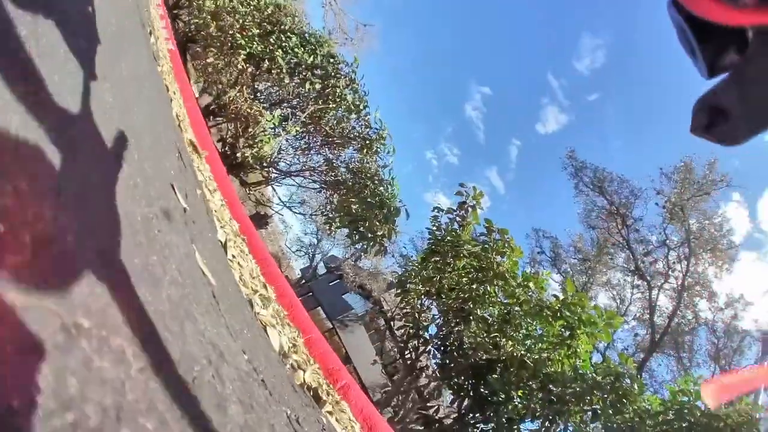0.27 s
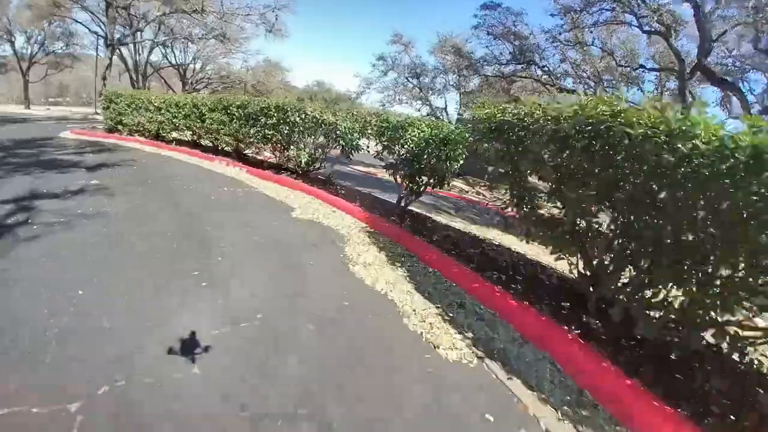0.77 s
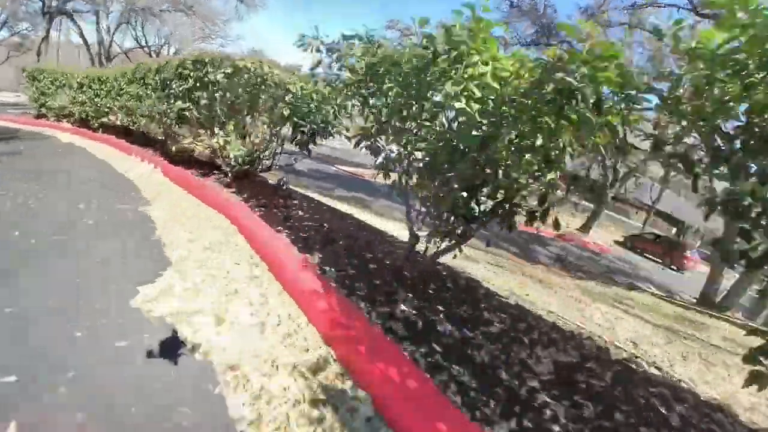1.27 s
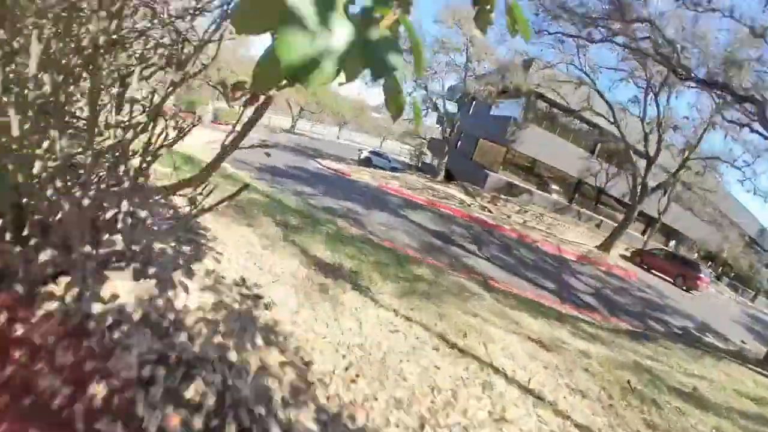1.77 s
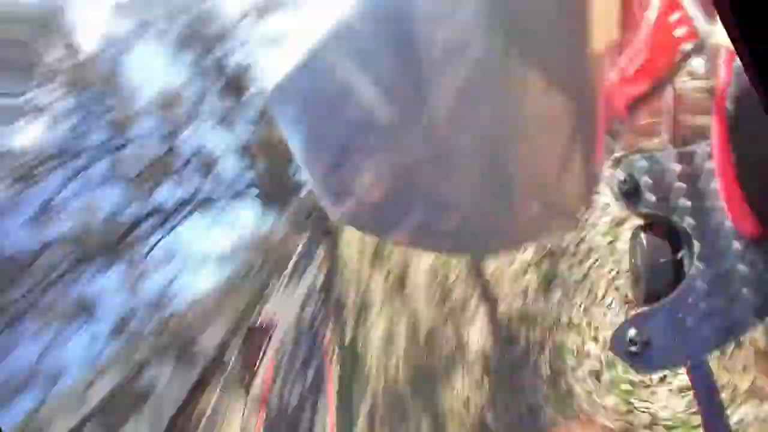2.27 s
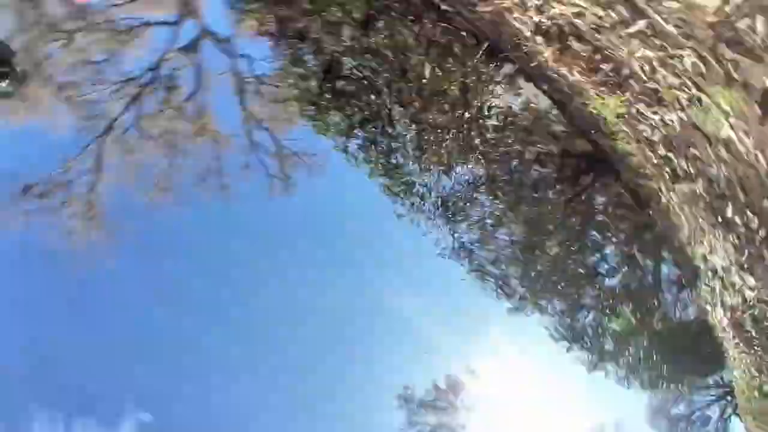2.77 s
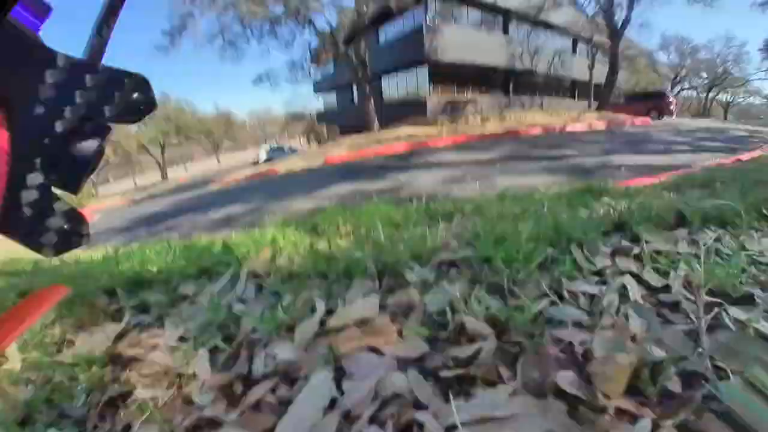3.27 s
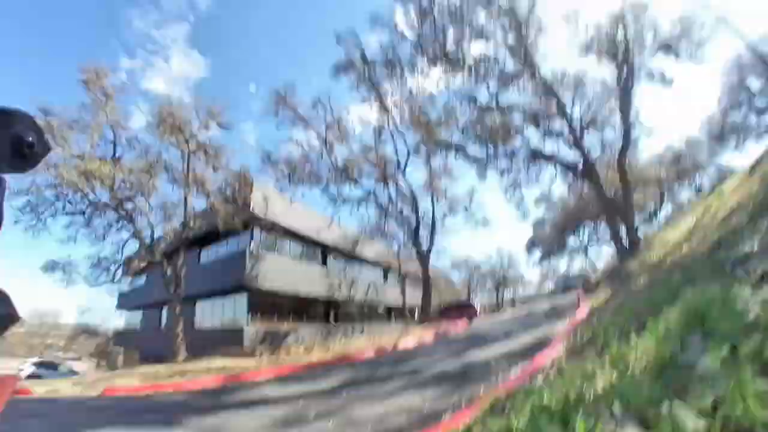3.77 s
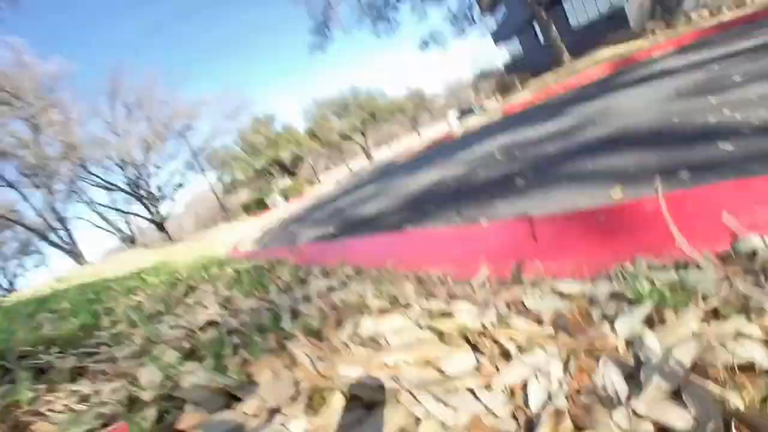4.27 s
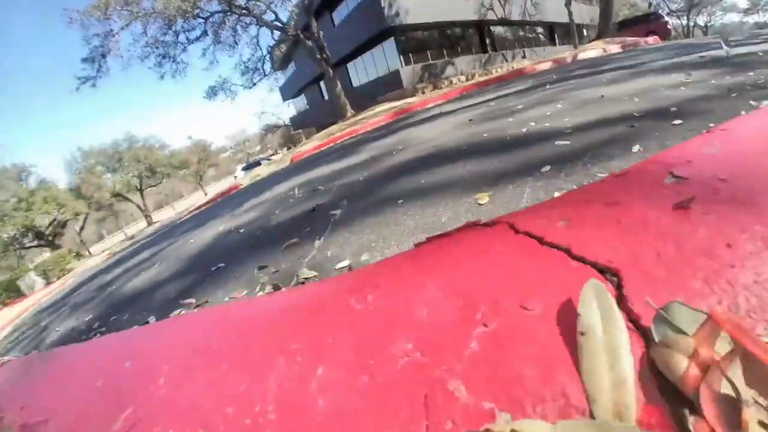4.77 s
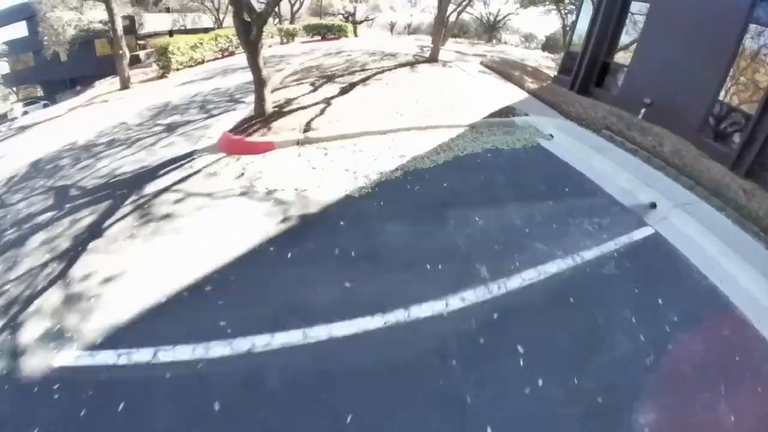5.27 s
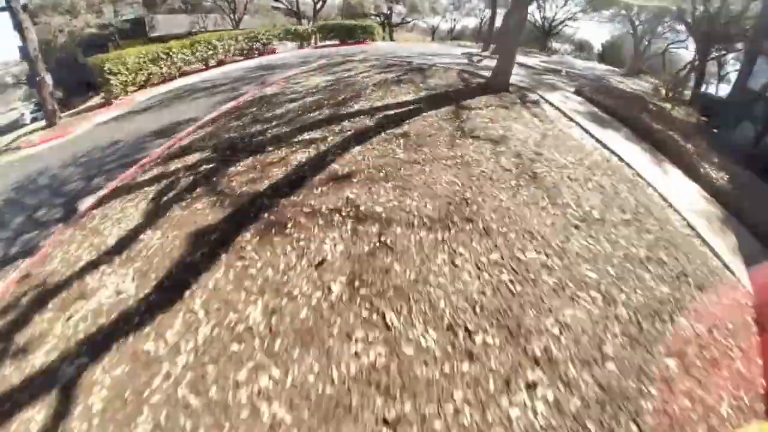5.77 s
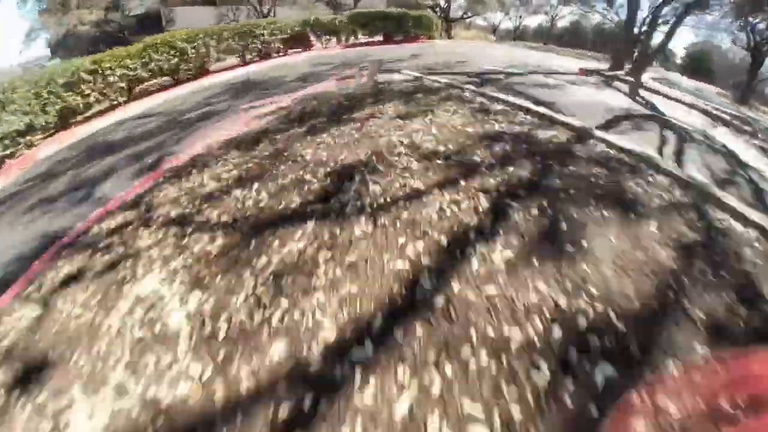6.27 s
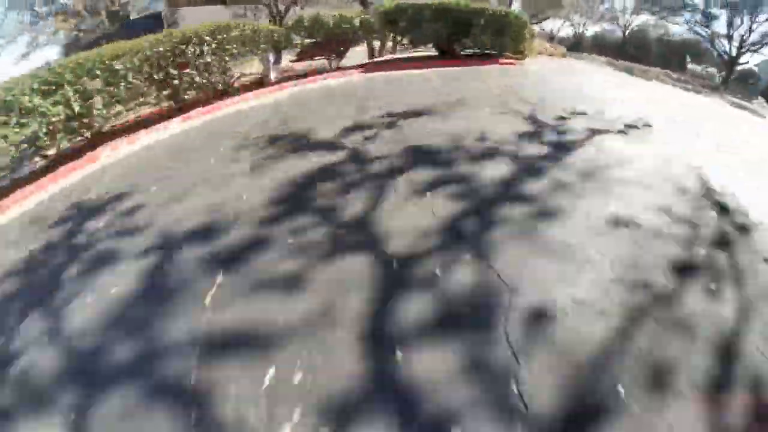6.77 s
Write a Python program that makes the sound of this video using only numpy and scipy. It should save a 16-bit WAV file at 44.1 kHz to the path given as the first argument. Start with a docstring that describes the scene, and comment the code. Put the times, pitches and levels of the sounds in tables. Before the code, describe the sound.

Heard on board, a quadcopter buzzes, crashes with shrieking motors, cracking twigs and crunching leaves, and after a pause whines steadily in flight.

```python
"""A small racing quadcopter with four three-bladed rotors, heard on board in three abruptly joined scenes.
0 s: it settles after a fall, with a few knocks and a propeller running down.
0.8 s: it flies at a hedge, the rotors beating against each other and chopping the air.
At 1.8 s it hits; two motors scream in the branches and it tumbles through dry leaves until 4.8 s.
5.3 s: it flies fast and low until the throttle is cut at 6.8 s and it sinks into its own wake."""
import sys
import numpy as np
from scipy.fft import rfft, irfft, next_fast_len
from scipy.io import wavfile
from scipy.ndimage import map_coordinates

SR = 44100
rng = np.random.default_rng(int(sys.argv[2]) if len(sys.argv) > 2 else 0)


def to_wav(sig):
    """Store sig (one row per channel, or 1-D mono) as 16-bit WAV at the path in sys.argv[1].

    Samples outside -1..1 are clipped; the rate is SR.
    """
    pcm = np.clip(np.atleast_2d(sig), -1, 1) * 32767
    pcm = np.round(pcm).astype(np.int16)
    wavfile.write(sys.argv[1], SR, pcm.T)  # frames by channels


N = 310464


def amp(db):
    return 10 ** (np.asarray(db) / 20)


def unit_rms(x):
    return x / np.sqrt(np.mean(x ** 2) + 1e-20)


def clock():
    return np.arange(N) / SR


def curves(rows):
    """One value per sample for each column after the time."""
    times, *columns = np.transpose(rows)
    return [np.interp(clock(), times, column) for column in columns]


def span(start_s, end_s, fade_s):
    """Gate: on at once, fading out up to the end."""
    return (clock() >= start_s) * np.clip((end_s - clock()) / fade_s, 0, 1)


def swell(start_s, end_s, rise_s, fall_s):
    """Gain 1 from start to end; rise and fall times are per 20 dB."""
    t = clock()
    return amp(-20 * np.clip(np.maximum((start_s - t) / rise_s, (t - end_s) / fall_s), 0, 10))


def boost_db(rows, edge_s):
    """Extra level over each (start, end, dB) stretch, with sloping edges."""
    return sum(np.interp(clock(), [start - edge_s, start, end, end + edge_s], [0, db, db, 0])
               for start, end, db in rows)


def wobble(rate_hz):
    """Smooth random curve through Gaussian knots."""
    knots = rng.standard_normal(int(N * rate_hz / SR) + 4)
    fine = np.arange(0, len(knots), 1 / 8)
    return np.interp(clock() * rate_hz, fine, map_coordinates(knots, [fine]))


def colour(x, spectrum):
    """Minimum-phase filter of unit power gain through (Hz, dB) points."""
    size = 2 * next_fast_len(N // 2 + SR // 4)
    hz, db = np.transpose(spectrum)
    bin_hz = np.fft.rfftfreq(size, 1 / SR)
    gain = unit_rms(amp(np.interp(np.log(bin_hz + 1), np.log(hz), db)))
    cepstrum = irfft(np.log(gain + 1e-6), size)
    cepstrum[1:size // 2] *= 2
    cepstrum[size // 2 + 1:] = 0
    return irfft(rfft(x, size) * np.exp(rfft(cepstrum)), size)[:N]


def noise(spectrum, texture=1):
    """Coloured noise of rms 1; the texture shapes it in time before the filter."""
    return unit_rms(colour(texture * rng.standard_normal(N), spectrum))


def crackle(spectrum, snap_db, clump_db):
    """Dry leaves: tiny snaps of very unequal size, bunched in clumps."""
    return noise(spectrum, amp(snap_db * wobble(3000) + clump_db * wobble(260)))


def spin(hz, jitter, rate_hz):
    """Angle [rad] of a rotation with unsteady speed."""
    return 2 * np.pi * (np.cumsum(hz * (1 + jitter * wobble(rate_hz))) / SR + rng.random())


def partials(angle, orders, flutter_db):
    """Partials locked to a shaft, each fluttering in the turbulent air."""
    return sum(amp(db + flutter_db * wobble(45)) * np.sin(order * angle + 2 * np.pi * rng.random())
               for order, db in orders)


# Outdoor hum (frequency [Hz], level [dB])
HUM_SPECTRUM = [(18, -70.5), (30, -32), (164, -12), (324, -6.5), (410, -8.5), (467, -3.5), (691, 0),
                (897, -3), (1470, -12.5), (3070, -20), (14000, -27), (15500, -31)]


def outdoor_hum():
    """Distant hum, louder from the second scene on."""
    return amp(np.where(clock() < 0.77, -75, -70)) * noise(HUM_SPECTRUM)


# Flutter peaks (time [s], level [dB])
FLUTTER_PEAKS = [(.01, -39), (2.93, -59), (3.48, -60.5)]
# Flutter (frequency [Hz], level [dB])
FLUTTER_SPECTRUM = [(150, -34), (350, -4.5), (500, -0.5), (900, -2.5), (1500, -15.5), (4000, -40)]


def stalled_propeller(edge_s=0.079):
    """A stalled propeller flutters softly."""
    gain = sum(amp(db) * swell(s, s, edge_s, edge_s) for s, db in FLUTTER_PEAKS)
    return gain * noise(FLUTTER_SPECTRUM)


# Coasting propeller (time [s], blade-pass frequency [Hz], level [dB])
RUNDOWN = [(.07, 1600, -75), (.1, 1530, -57), (.13, 1300, -67), (.16, 980, -65), (.2, 600, -80),
           (.225, 450, -70), (.255, 415, -56), (.29, 405, -65), (.37, 400, -78)]


def rundown():
    """A faint, shaky whine falls as a propeller coasts to rest."""
    hz, db = curves(RUNDOWN)
    angle = spin(hz, jitter=0.035, rate_hz=260)
    gate = span(RUNDOWN[0][0], RUNDOWN[-1][0], fade_s=0.02)
    return amp(db + 3.1 * wobble(120)) * np.sin(angle) * gate


# Hard contacts (time [s], tick level [dB], thud re tick [dB], strikes [count])
CONTACTS = [(0.0191, -28.5, -24, 1), (.078, -24, -45, 1), (.3535, -46.5, -33, 1), (1.8023, -12, -13, 1),
            (2.0245, -14.5, -40, 1), (2.7036, -16, -27, 1), (2.7687, -28, -23, 2), (3.143, -42.5, -0.5, 1),
            (3.1748, -15, -17.5, 1), (3.2045, -23, -13, 1), (3.2188, -16.5, -22, 1), (3.2349, -27, -15, 3),
            (3.31, -37, -21, 1), (3.421, -34.5, -31.5, 1), (3.435, -31.5, -16, 1), (3.69, -36, -26.5, 1),
            (3.9525, -16, -39, 1), (4.187, -14, -17, 1), (4.2187, -18, -26, 1), (4.2945, -25, -15, 1),
            (4.3416, -20, -14, 3), (4.4005, -26, -12, 1), (4.4762, -19.5, -18, 1), (4.6688, -35, -10, 1),
            (4.707, -29.5, -12.5, 3)]
# Sharp tick and dull thud (frequency [Hz], level [dB])
TICK_SPECTRUM = [(300, -20), (1200, -1), (2700, -1.5), (4500, -2.5), (9000, -9.5), (15000, -16.5)]
THUD_SPECTRUM = [(30, -20.5), (120, -8), (300, 0.5), (700, 1), (1200, -3.5), (2500, -16.5), (6000, -42.5)]


def knocks(tick_gain_db=9.5, thud_gain_db=27, tick_t60_s=0.0089, thud_t60_s=0.013):
    """The stiff frame hardly rings: each contact is a sharp push and a brief rattle of equal energy."""
    blade_gap_s, blade_loss_db = 0.0147, 2
    t = np.arange(SR // 20) / SR
    ticks, thuds = np.zeros(N), np.zeros(N)

    def strike(track, start_s, db, t60_s):
        rattle = rng.standard_normal(len(t)) * amp(-60 * t / t60_s)
        blow = (t == 0) + rattle / np.linalg.norm(rattle)
        track[round(start_s * SR):][:len(t)] += amp(db) * blow / np.linalg.norm(blow)

    for first_s, first_db, thud_db, strikes in CONTACTS:
        for blade in range(round(strikes)):  # a turning propeller strikes repeatedly
            start_s = first_s + blade * blade_gap_s
            db = first_db - blade * blade_loss_db
            strike(ticks, start_s, db + tick_gain_db, tick_t60_s)
            strike(thuds, start_s, db + thud_db + thud_gain_db, thud_t60_s)
    return colour(ticks, TICK_SPECTRUM) + colour(thuds, THUD_SPECTRUM)


# Slides (start [s], end [s], level [dB])
SLIDES = [(1.95, 2.17, -42), (2.58, 2.739, -55), (2.78, 2.872, -60.5), (3.218, 3.47, -57),
          (3.619, 3.68, -60), (3.98, 4.241, -54.5), (4.36, 4.788, -40.5)]
# Light brushing (frequency [Hz], level [dB])
BRUSH_SPECTRUM = [(59, -71), (100, -31.5), (243, -16.5), (326, -11), (487, -6), (879, -4.5), (1430, -12.5),
                  (2810, -3), (4020, -9.5), (8770, -7.5), (15500, -14)]


def leaf_slides(snaps_per_s=110, edge_s=0.068, gain_db=-5):
    """Leaves slide along the frame; single dry ones break."""
    snaps = (rng.random(N) < snaps_per_s / SR) * amp(4 * rng.standard_normal(N))
    scrape = crackle(BRUSH_SPECTRUM, snap_db=3.5, clump_db=3)
    breaks = amp(-6.5) * unit_rms(colour(snaps, TICK_SPECTRUM))
    gain = sum(amp(db + gain_db) * swell(start, end, edge_s, edge_s) for start, end, db in SLIDES)
    return gain * (scrape + breaks)


# Plunges into leaves (peak time [s], level [dB], fall per 20 dB [s])
PLUNGES = [(.005, -44.5, 0.1), (1.886, -23.5, .014), (1.961, -26.5, .04), (2.05, -29.5, .045),
           (2.302, -25, 0.03), (2.322, -25.5, .012), (2.37, -45, .035), (2.482, -37, 0.04),
           (2.549, -21.5, .013), (2.636, -24, 0.0217), (2.684, -30, .014), (3.139, -36, 0.01),
           (3.168, -32, .012), (3.191, -32, .014), (3.594, -22, 0.02), (3.866, -44, .02),
           (3.897, -29, 0.0341), (3.927, -27, .022), (4.184, -28.5, 0.0174), (4.285, -36, 0.07),
           (4.336, -29, 0.0383), (4.462, -32, 0.0637), (4.56, -40, 0.0636)]
# Breaking twigs (time [s], level [dB])
TWIG_CRACKS = [(.262, -60), (.41, -70), (1.801, -29), (1.866, -16.5), (2.107, -24), (2.25, -21.5),
               (2.668, -22), (2.75, -26), (2.857, -46), (2.971, -47), (3.022, -44), (3.123, -47),
               (3.39, -44), (3.563, -31.5), (3.876, -19.5), (4.265, -33.5), (4.327, -25.5)]
# Crushed leaves and the frame's ring (frequency [Hz], level [dB])
CRUNCH_SPECTRUM = [(35, -36), (60, -21), (464, -2), (613, -1.5), (1320, -3), (2050, 1.5), (2250, 4),
                   (4520, -2), (5580, 2), (6870, -5), (8470, -4), (14100, -12), (15500, -10.5)]
FRAME_SPECTRUM = [(300, -17.5), (1200, -10.5), (1800, -2.5), (2500, -1), (3200, -5), (4200, -12.5),
                  (9000, -23)]


def leaf_crunches(settle_db=-26, settle_s=0.11):
    """Plunges swell, fade and settle, and twigs crack; hard hits shake the frame, light ones rustle."""
    power = np.zeros(N)
    for peak_s, db, fall_s in PLUNGES:
        rise_s = 0.82 * fall_s
        power += (amp(db) * swell(peak_s, peak_s, rise_s, fall_s)) ** 2
        power += (amp(db + settle_db) * swell(peak_s, peak_s, rise_s, settle_s)) ** 2
    for peak_s, db in TWIG_CRACKS:
        power += (amp(db) * swell(peak_s, peak_s, rise_s=0.0017, fall_s=0.015)) ** 2
    force = np.sqrt(power)
    hard_share = force / (force + amp(-33.5))
    crunch = np.sqrt(hard_share) * crackle(CRUNCH_SPECTRUM, snap_db=4, clump_db=2.5)
    rustle = np.sqrt(1 - hard_share) * crackle(BRUSH_SPECTRUM, snap_db=5, clump_db=3)
    ring = amp(-5) * force / (force + amp(-21)) * noise(FRAME_SPECTRUM)
    return force * amp(1) * (crunch + rustle + ring)


def throttle(bursts, idle_hz=150.0, spool_hz_per_s=5100, brake_s=0.035):
    """Shaft speed and gain: each burst spools a motor up at a fixed rate; it brakes exponentially."""
    t = clock()
    shaft_hz, gain = np.full(N, idle_hz), np.zeros(N)
    for on_s, off_s, top_hz, db, swell_s, fade_s in bursts:
        ramp = np.maximum(t - on_s, 0) * spool_hz_per_s / (top_hz - idle_hz)
        climb = ramp / (1 + ramp ** 8) ** (1 / 8)  # levels off at 1
        brake = np.exp(-np.maximum(t - off_s, 0) / brake_s)
        shaft_hz = np.maximum(shaft_hz, idle_hz + climb * brake * (top_hz - idle_hz))
        gain = np.maximum(gain, amp(db) * swell(on_s + swell_s, off_s, swell_s / 2, fade_s))
    return shaft_hz, gain


BLADES = 3
# Full-throttle bursts of two motors
# (on [s], off [s], top shaft speed [Hz], level [dB], swell [s], fade per 20 dB [s])
FIRST_MOTOR_BURSTS = [(1.866, 2.172, 499.3, -26, .075, 0.12), (2.184, 2.303, 497, -25.5, .035, .014),
                      (2.448, 2.555, 431.5, -37.5, .06, 0.13), (2.515, 2.625, 481.4, -35, 0.081, .035),
                      (2.58, 2.73, 435, -52.5, .05, 0.19)]
SECOND_MOTOR_BURSTS = [(1.871, 2.182, 486.4, -34.5, 0.093, .06), (2.203, 2.312, 467.4, -33.5, .085, .022),
                       (2.497, 2.551, 402, -32, 0.044, .016), (2.53, 2.64, 442, -41.5, 0.072, 0.058)]
# Envelope of the blade partials (frequency [Hz], level [dB])
SCREAM_SPECTRUM = [(400, -3), (900, 6), (1500, -3), (3000, -1), (4500, -5), (6000, -9.5), (7500, -12),
                   (9000, -9.5), (12000, -16), (15000, -11.5)]
# Bending blades raise the shaft orders between blade passes (time [s], level [dB])
BLADE_BEND = [(2.2, -23.5), (2.3, -18.5), (2.55, -5.5)]


def screaming_motor(bursts, rasp_db, gain_db=-4, unbalance_db=-14):
    """A motor at full power buzzes on every shaft order; each blade pulse sheds a puff of hiss."""
    shaft_hz, gain = throttle(bursts)
    bend = amp(curves(BLADE_BEND)[0])
    falter = 0.006 * wobble(28) + 0.03 * bend * wobble(60)
    angle = spin(shaft_hz * (1 + falter), jitter=0.0032, rate_hz=160)
    gate = span(bursts[0][0], bursts[-1][1] + 0.07, fade_s=0.07)
    on = gate > 0
    t = clock()[on]
    buzz = np.zeros(N)
    for order in range(1, 32):
        flutter_db = 2 * map_coordinates(rng.standard_normal(N // 100), [t * 70])
        size = amp(np.interp(order * shaft_hz[on], *np.transpose(SCREAM_SPECTRUM)) + flutter_db)
        if order == 1:
            size *= np.maximum(bend[on], amp(unbalance_db))
        elif order % BLADES:
            size *= bend[on]
        buzz[on] += size * np.sin(order * angle[on] + 2 * np.pi * rng.random())
    stutter = amp(5.2 * bend * wobble(90))  # bent blades catch in twigs
    load = amp(1.5 * wobble(35))  # blades meet leaves
    puffs = (1 + np.cos(BLADES * angle)) ** 2
    rasp = amp(rasp_db) * noise(BRUSH_SPECTRUM, puffs)
    return amp(gain_db) * gain * load * gate * (stutter * buzz + rasp)


# Prop wash, blade hiss and top-octave fizz (frequency [Hz], level [dB])
WASH_SPECTRUM = [(20, -13), (60, -8.5), (130, -4), (280, -4.5), (600, 2.5), (1300, 0.5), (2000, 0.5),
                 (2800, -0.5), (3500, -26.5), (6000, -40)]
HISS_SPECTRUM = [(1500, -33), (2800, 5), (3600, 0.5), (5000, 1.5), (6500, -5), (8300, -11), (11000, -28.5)]
FIZZ_SPECTRUM = [(4000, -30), (7000, 1), (9000, 0), (12000, -5), (15500, -11)]
# Rough air tearing at the blades (start [s], end [s], extra hiss [dB])
ROUGH_AIR = [(5.2, 5.7, 5)]


def rushing_air(wash_db, hiss_db, fizz_db, speed_octaves, wake, gusts):
    """Air chopped by the blades; faster blades and rough air hiss more."""
    rough_db = boost_db(ROUGH_AIR, edge_s=0.075)
    wash = amp(wash_db - 5.9 * wake) * noise(WASH_SPECTRUM, gusts)
    hiss = amp(hiss_db + 4.5 * speed_octaves + rough_db - 1.5 * wake) * noise(HISS_SPECTRUM, gusts)
    fizz = amp(fizz_db + 14.5 * speed_octaves) * noise(FIZZ_SPECTRUM, gusts)
    return wash + hiss + fizz


# Motor braking (start [s], end [s], extra whine [dB])
BRAKING = [(.76, .79, 10.5), (6.91, 7.1, 18.5)]


def magnetic_whine(angles, levels_db, cogs=36):
    """Each motor whines at its cogging rate, louder under braking."""
    whine = sum(amp(db + 3.6 * wobble(60)) * np.sin(cogs * angle + 0.6 * wobble(300))
                for angle, db in zip(angles, levels_db))
    return amp(boost_db(BRAKING, edge_s=0.03)) * whine


# Rotor overtones and unbalance partials (shaft order [1], level [dB])
ROTOR_ORDERS = [(2, -27), (4, -20), (5, -19), (6, -7), (7, -21), (8, -19), (9, -8), (10, -22), (12, -13),
                (15, -21), (21, -25), (25, -20)]
UNBALANCE_ORDERS = [(1, -4.5), (2, 0), (4, -8), (5, -13.5), (6, -14.5)]


def rotor_tones(angles, blade_levels_db, overtone_levels_db, unbalance_db):
    """Blade-pass tones and overtones beat against each other; the first rotor is out of balance."""
    tones = np.zeros(N)
    for angle, blade_db, overtone_db in zip(angles, blade_levels_db, overtone_levels_db):
        tones += amp(blade_db + 1.4 * wobble(45)) * np.sin(BLADES * angle)
        tones += amp(overtone_db) * partials(angle, ROTOR_ORDERS, flutter_db=2.5)
    return tones + amp(unbalance_db) * partials(angles[0], UNBALANCE_ORDERS, flutter_db=2)


# Sinking into the wake (time [s], turbulent share [0-1])
WAKE_SHARE = [(6.83, 0.01), (6.92, 0.7), (7.04, 0.3)]
# Wake buffeting (frequency [Hz], level [dB])
BUFFET_SPECTRUM = [(60, -27), (200, -4), (300, 0.5), (420, -3), (560, -5), (1000, -4), (1800, -11),
                   (3000, -34)]


def flight(controls, rotors, levels, unused_tone_gain_db, unbalance_db, hiss_db, fizz_db, whine_db_per_oct, chop):
    """Four rotors follow throttle and steering; in their own wake the tones break up into buffeting."""
    shaft_hz, steering = curves(controls)
    tone_db, wash_db = curves(levels)
    wake = curves(WAKE_SHARE)[0]
    ratios, responses, blade_db, overtone_db, whine_db = np.transpose(rotors)
    speed_octaves = np.log2(shaft_hz / np.max(np.transpose(controls)[1]))
    angles = [spin(shaft_hz * (ratio + response * steering), jitter=0.003097, rate_hz=70)
              for ratio, response in zip(ratios, responses)]
    tones = rotor_tones(angles, blade_db, overtone_db, unbalance_db)
    whine = amp(whine_db_per_oct * speed_octaves) * magnetic_whine(angles, whine_db)
    pulses = sum(np.cos(BLADES * angle) + np.cos(angle) for angle in angles)
    gusts = np.exp(chop * pulses) * amp(0.91 * wobble(90))
    wash_swing_db = wash_db - np.mean(np.transpose(levels)[2])
    air = rushing_air(wash_db - 0.5, hiss_db + 0.45 * wash_swing_db, fizz_db, speed_octaves, wake, gusts)
    buffet = amp(6) * noise(BUFFET_SPECTRUM, gusts)
    return amp(tone_db) * (np.sqrt(1 - wake) * tones + np.sqrt(wake) * buffet) + whine + air


# Throttle and steering (time [s], base shaft speed [Hz], steering [share of speed])
APPROACH_CONTROLS = [(.77, 149, -.055), (.82, 138.9, -0.046), (.96, 132.1, -.052), (1.04, 134.6, 0.016),
                     (1.12, 158.2, 0.068), (1.21, 178, 0.048), (1.32, 187.4, .035), (1.46, 189.9, 0.041),
                     (1.64, 180.5, 0.083), (1.9, 172.5, 0.099)]
CRUISE_CONTROLS = [(5.27, 202, -.01), (5.42, 204.5, -0.017), (5.62, 218, -0.017), (5.8, 232, -0.0045),
                   (5.95, 237.5, .002), (6.12, 238, 0.004), (6.35, 230.7, 0.0031), (6.55, 228.2, -0.0061),
                   (6.78, 205.6, -.003), (6.9, 146.9, -.2), (6.96, 145.9, -0.21), (7.04, 150, -.19)]
# Rotors (speed ratio [1], steering response [1], blade tone [dB], overtones [dB], whine [dB])
APPROACH_ROTORS = [(1, 0, -4, -21.5, -60.5), (1, 1, -.5, -21.5, -64), (1.183, .3, -1.5, -2, -54.5),
                   (1.207, .5, -5.5, -8, -55)]
CRUISE_ROTORS = [(1, 0.0061, -3, -2.5, -60), (0.99, 1, -2, -7.5, -43.5), (.938, 1.2, -6.5, -5.5, -47.5),
                 (0.96, .6, -4, -9, -60)]
# Flight loudness (time [s], tone level [dB], wash level [dB])
APPROACH_LEVELS = [(0.775, -37, -31), (0.839, -32, -38.5), (1.021, -32.5, -38.5), (1.169, -26, -34.5),
                   (1.521, -28, -33.5), (1.765, -28.5, -30.5), (1.78, -32, -32)]
CRUISE_LEVELS = [(5.28, -30.5, -25), (5.69, -26.5, -28), (5.744, -22.5, -27), (5.804, -28, -28.5),
                 (6.28, -23, -28.5), (6.588, -27, -33), (6.71, -24.5, -29.5), (6.838, -27.5, -32),
                 (6.872, -34.5, -29), (7.04, -23.5, -27)]


def flights():
    """The run at the hedge and the fast low pass; both start abruptly."""
    approach = flight(APPROACH_CONTROLS, APPROACH_ROTORS, APPROACH_LEVELS, unused_tone_gain_db=-1.5,
                      unbalance_db=-8, hiss_db=-37.5, fizz_db=-41.5, whine_db_per_oct=-6, chop=0.08)
    cruise = flight(CRUISE_CONTROLS, CRUISE_ROTORS, CRUISE_LEVELS, unused_tone_gain_db=-0.5,
                    unbalance_db=-5.5, hiss_db=-35.5, fizz_db=-38.5, whine_db_per_oct=20, chop=0.082)
    return approach * span(0.7716, 1.91, fade_s=0.048) + cruise * span(5.2755, 8, fade_s=0.01)


def scene():
    """Everything reaches one microphone on the frame."""
    scream = screaming_motor(FIRST_MOTOR_BURSTS, rasp_db=-8)
    scream += screaming_motor(SECOND_MOTOR_BURSTS, rasp_db=-5)
    crash = leaf_crunches() + leaf_slides() + knocks()
    mono = flights() + scream + crash + rundown() + outdoor_hum() + stalled_propeller()
    return np.array([mono, mono])


def record(dry):
    """The on-board camera rounds off the highest peaks and limits the band."""
    ceiling, top_hz = 0.32, 15600
    limited = dry / (1 + np.abs(dry / ceiling) ** 6) ** (1 / 6)
    size = next_fast_len(N + SR // 4)
    passband = np.fft.rfftfreq(size, 1 / SR) < top_hz
    return irfft(rfft(limited, size) * passband, size)[:, :N]


dry = scene()
out = record(dry)
to_wav(out)
```